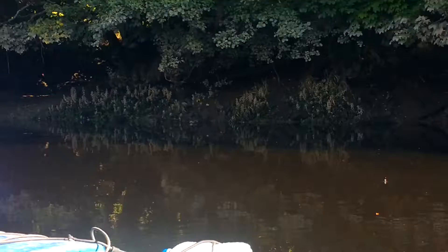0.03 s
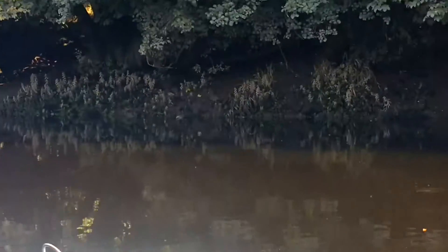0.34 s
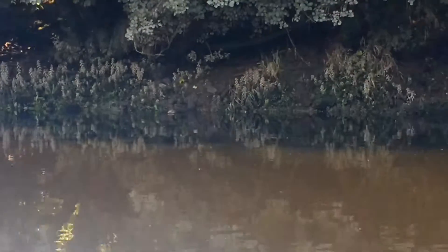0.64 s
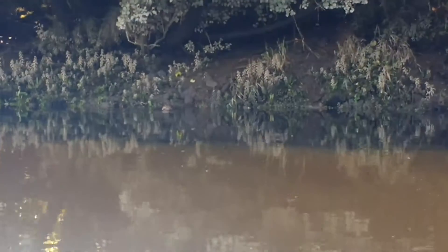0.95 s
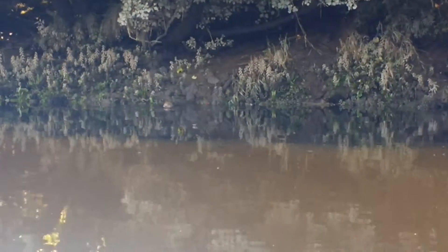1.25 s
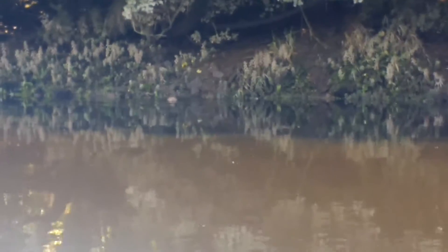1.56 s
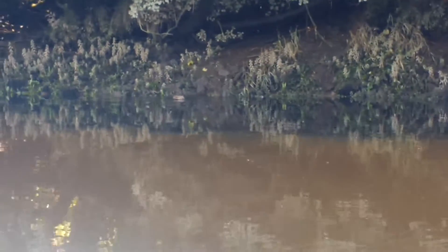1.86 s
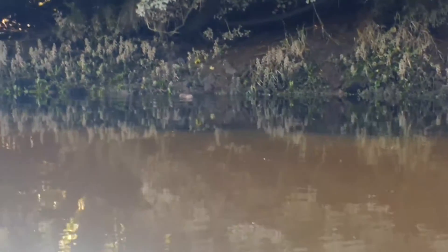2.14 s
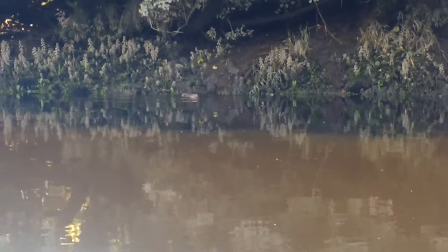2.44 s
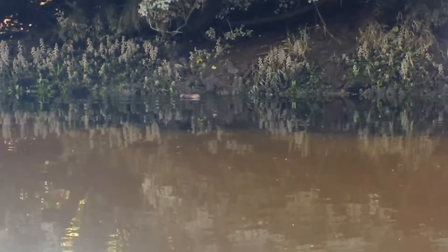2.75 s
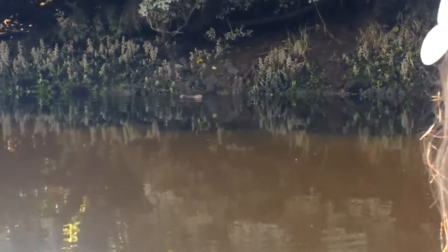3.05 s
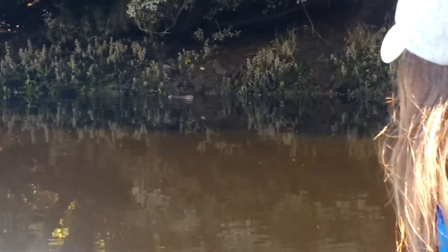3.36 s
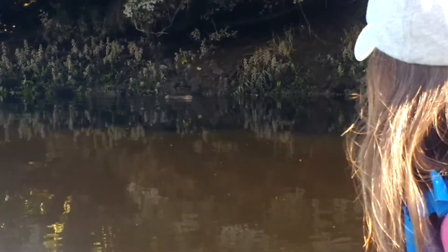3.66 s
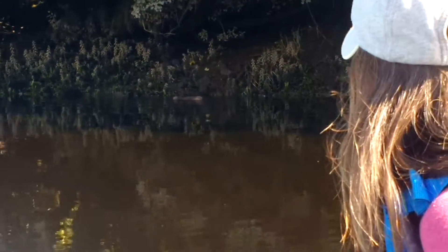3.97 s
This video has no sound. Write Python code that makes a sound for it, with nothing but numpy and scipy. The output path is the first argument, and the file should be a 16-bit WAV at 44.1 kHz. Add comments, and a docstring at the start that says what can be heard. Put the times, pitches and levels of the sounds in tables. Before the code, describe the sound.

A low, distant rush like wind or traffic fades in and gently swells along a calm river bank. Close to the microphone, a few water drops plink and two soft bubbles gulp over a thin hiss and faint drone.

```python
"""A low, distant rush, like wind or traffic, fades in, then swells and eases along a calm river bank.
Close to the microphone a few drops plink, each a surface tick and a ringing bubble; larger bubbles gulp.
Behind them lie a thin, steady hiss of water and leaves and a faint, far drone.
Two closely spaced microphone ports pick it all up, the left one later and mostly weaker in the lows."""
import sys
import numpy as np
from scipy import signal
from scipy.fft import rfft, irfft
from scipy.io import wavfile
from scipy.ndimage import uniform_filter1d

SR = 44100
rng = np.random.default_rng(int(sys.argv[2]) if len(sys.argv) > 2 else 0)


def transcribe(signal):
    """Save signal, clipped to [-1, 1], as a 16-bit WAV file at the path in sys.argv[1]."""
    frames = np.atleast_2d(signal).T
    limited = np.clip(frames, -1, 1)
    pcm = np.round(limited * 32767).astype(np.int16)
    wavfile.write(sys.argv[1], SR, pcm)


N = 176400


def distant_rush():
    """A far roar of low noise that swells most in its middle range."""
    # spectrum of the rush: frequency_hz, density_db
    spectrum = [(25, -101), (42, -87), (60, -85), (100, -76.5), (130, -73), (190, -71.5), (270, -71.5),
                (350, -71), (450, -71.5), (550, -71), (700, -67), (850, -68.5), (1050, -72), (1250, -76),
                (1550, -87), (2100, -87), (2600, -102.5), (3300, -110), (6000, -130)]
    # its rise and fall: time_s, gain_db
    swell = [(0.3, 0), (0.55, -1.5), (0.78, -1), (1.08, -4.5), (1.3, 0.1), (1.5, -3.4), (1.88, -1.5),
             (2.08, 1.3), (2.28, -1.5), (2.48, 2.1), (2.66, 4.5), (2.97, 2), (3.12, 1.1), (3.27, -2),
             (3.5, 0.4), (3.7, 3), (3.9, -2), (4.0, -0.7)]
    # how strongly each band follows: frequency_hz, swell_share
    follow = [(80, 0.37), (160, 0.5), (280, 0.84), (450, 0.87), (680, 0.81), (920, 1.29), (1250, 0.71),
              (3000, 0.9)]

    def density_db(hz, t):
        return at_hz(spectrum, hz) + at_hz(follow, hz) * at_time(swell, t)

    return stereo_noise(density_db, patchy_db=1.16, flicker_db=0.0)


def close_drops():
    """Each drop ticks on the water and traps a bubble that rings briefly as its pitch bends."""
    # drops on the water; the row at 1.1428 s is a second, smaller bubble of the drop just before it: start_s,
    # bubble_db, pitch_hz, bend_hz, tick_db, tick_top_hz
    drops = [(1.0395, -37.5, 2440, -300, -59, 3600), (1.1423, -22.5, 2440, 400, -42, 7900),
             (1.1428, -44, 4220, 0, -37, 4000), (1.418, -39, 3460, -150, -44.5, 4180),
             (2.2300, -43, 2460, -350, -48.5, 8000)]
    # reflections of each drop: delay_s, gain_db
    echoes = [(.0060, -21), (0.0106, -24), (0.015, -29)]
    rise_s, onset_s, decay_s, bend_s = 0.0021, 0.0004, 0.0012, 0.0075
    ring_db, ring_s = -41, 0.0077
    tick_s, tick_low_hz = 0.0023, 2960
    out, t = np.zeros(N), np.arange(SR // 20) / SR
    rise = np.minimum(t / rise_s, 1) ** .5 / (1 + np.exp((rise_s - t) / onset_s))
    envelope = rise * (np.exp(-t / decay_s) + amp(ring_db) * np.exp(-t / ring_s))
    for start_s, bubble_db, pitch_hz, bend_hz, tick_db, tick_top_hz in drops:
        glide_hz = pitch_hz + bend_hz * (1 - np.exp(-t / bend_s))
        bubble = envelope / envelope.max() * np.sin(2 * np.pi * np.cumsum(glide_hz) / SR)
        band = signal.butter(2, [tick_low_hz, tick_top_hz], "band", fs=SR, output="sos")
        tick = signal.sosfilt(band, rng.standard_normal(len(t)) * np.exp(-t / tick_s))
        plink = amp(bubble_db) * bubble + amp(tick_db) * tick / abs(tick).max()
        add(out, start_s, plink)
        for delay_s, echo_db in echoes:
            add(out, start_s + delay_s, amp(echo_db) * plink)
    return out


def water_gulps():
    """Larger bubbles ring lower, swelling and dying softly."""
    # soft gulps: start_s, level_db, pitch_hz
    gulps = [(2.104, -33, 696), (3.822, -33.5, 710)]
    rise_s = 0.0053
    out, t = np.zeros(N), np.arange(SR // 15) / SR
    envelope = (t / rise_s * np.exp(1 - t / rise_s)) ** 2
    for start_s, level_db, pitch_hz in gulps:
        add(out, start_s, amp(level_db) * envelope * np.sin(2 * np.pi * pitch_hz * t))
    return out


def bank_hiss():
    """Water and leaves make a thin, even hiss."""
    # spectrum of the hiss: frequency_hz, density_db
    spectrum = [(600, -100), (1400, -85), (2100, -87), (2600, -92), (3300, -99.7), (4500, -103.2),
                (7000, -106), (8000, -106.5), (10000, -109.7), (15000, -114)]
    return stereo_noise(lambda hz, t: at_hz(spectrum, hz), patchy_db=1.2, flicker_db=0.4)


def far_drone():
    """Narrow bands of noise, heard as low, wavering tones that come and go."""
    # tones ahead of the port balance: pitch_hz, half_width_hz, left_db, right_db, swell_share
    tones = [(84.4, 3.7, -64, -55.5, 0.14), (153.5, 11, -61.5, -62, 0.25), (229.2, 7.1, -48, -60, 0.92),
             (301.5, 5, -52, -62, 0.89)]
    # rise and fall of the drone: time_s, gain_db
    swell = [(0.45, 1), (0.85, -4), (1.25, 3), (1.45, -6.5), (1.65, 4), (2.1, -3), (2.6, 2), (3.25, -3.5),
             (3.65, 3), (4.0, 12)]
    hz, out = np.fft.rfftfreq(N, 1 / SR), np.zeros((2, N))
    swell_db = at_time(swell, np.arange(N) / SR)
    for pitch_hz, half_width_hz, left_db, right_db, swell_share in tones:
        peak = 1 / (1 + ((hz - pitch_hz) / half_width_hz) ** 2)
        tone = unit_rms(irfft(rfft(rng.standard_normal((2, N))) * peak, N))
        out += amp([[left_db], [right_db]]) * amp(swell_share * swell_db) * tone
    return out


def stereo_noise(density_db, patchy_db, flicker_db):
    """Noise partly alike at both ports, shaped by density_db(hz, t), with drifting patches and flicker."""
    # how alike the two ports sound: frequency_hz, correlation
    likeness = [(40, .2), (120, 0.23), (170, 0.6), (300, 0.42), (480, 0.09), (580, 0.76), (750, 0.77),
                (1000, 1), (1200, 0.68), (1450, 0.85), (1800, 0.9), (2200, 0.91), (3000, 1)]
    # ceiling on that likeness, lower in the treble: frequency_hz, correlation
    ceiling = [(2200, .995), (4500, .955)]
    frames = dict(nperseg=2048, noverlap=1536)
    hz, t, (apart, right) = signal.stft(rng.standard_normal((2, N)), SR, **frames)
    hz = hz[:, None]
    patches = uniform_filter1d(rng.standard_normal((len(t), len(hz))), size=7, axis=0)  # along time
    patches = unit_rms(uniform_filter1d(patches, size=16, axis=1)).T  # along frequency
    flicker = unit_rms(uniform_filter1d(rng.standard_normal(len(t)), size=4))
    alike = np.clip(at_hz(likeness, hz), 0, at_hz(ceiling, hz))
    left = alike * right + np.sqrt(1 - alike ** 2) * apart
    gain = amp(density_db(hz, t) + patchy_db * patches + flicker_db * flicker) * np.sqrt(SR / 2)
    return signal.istft(np.array([left, right]) * gain, SR, **frames)[1][:, :N]


def amp(db):
    """Decibels to gain."""
    return 10 ** (np.asarray(db) / 20)


def unit_rms(x):
    """Scales to an rms of one."""
    return x / np.sqrt(np.mean(x ** 2) + 1e-20)


def at_hz(points, hz):
    """Reads a table along a log-frequency axis."""
    points_hz, values = np.transpose(points)
    return np.interp(np.log(hz + 1), np.log(points_hz + 1), values)


def at_time(points, t):
    """Reads a table along time."""
    return np.interp(t, *np.transpose(points))


def add(mix, start_s, sound):
    """Mixes a sound in at start_s."""
    part = mix[round(start_s * SR):][:len(sound)]
    part += sound[:len(part)]


def scene():
    """The river bank, near and far, as it reaches the two ports."""
    return distant_rush() + bank_hiss() + far_drone() + close_drops() + water_gulps()


def record(dry):
    """The ports differ in arrival time, level and phase; the sound is band-limited and fades in."""
    # left port relative to right: frequency_hz, gain_db
    balance = [(40, 4), (130, -4), (270, -6), (450, -7), (700, -8.5), (850, -4.4), (1050, 0.8), (1250, 0.5),
               (1550, -2), (2000, 0), (15000, 0)]
    # left port's phase on top of its delay, inverted in the treble: frequency_hz, phase_half_turns
    twist = [(60, 0), (200, .25), (450, .62), (900, 1), (15000, 1)]
    # fade-in, silent until its first point: time_s, gain_db
    fade = [(.148, -68), (.165, -19), (.2, -13.5), (.3, -6.5), (.39, 0)]
    left_delay_s, low_cut_hz, high_cut_hz = 0.00056, 37, 15500
    hz, t = np.fft.rfftfreq(N, 1 / SR), np.arange(N) / SR
    left_gain = amp(at_hz(balance, hz))
    left_phase = np.exp(1j * np.pi * (at_hz(twist, hz) - 2 * hz * left_delay_s))
    equal_power = np.sqrt(2 / (1 + left_gain ** 2))
    ports = np.array([left_gain * left_phase, np.ones(len(hz))]) * equal_power
    low_cut = 1 - np.exp(-(hz / low_cut_hz) ** 7)
    picked_up = irfft(rfft(dry) * ports * low_cut, N)
    fade_in = amp(at_time(fade, t)) * (t > fade[0][0])
    high_cut = signal.firwin(511, high_cut_hz, window=("kaiser", 9), fs=SR)
    return signal.oaconvolve(picked_up * fade_in, high_cut[None], "same")


dry = scene()
out = record(dry)
transcribe(out)
```